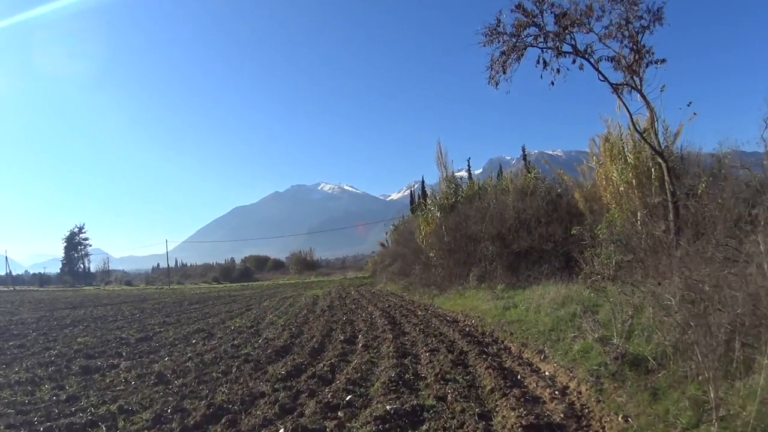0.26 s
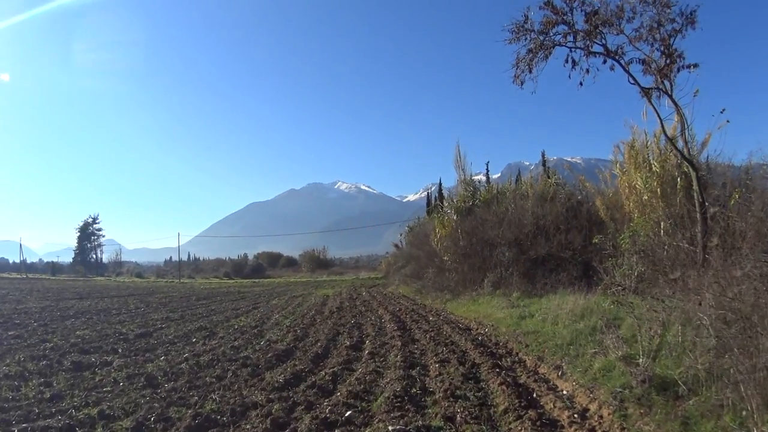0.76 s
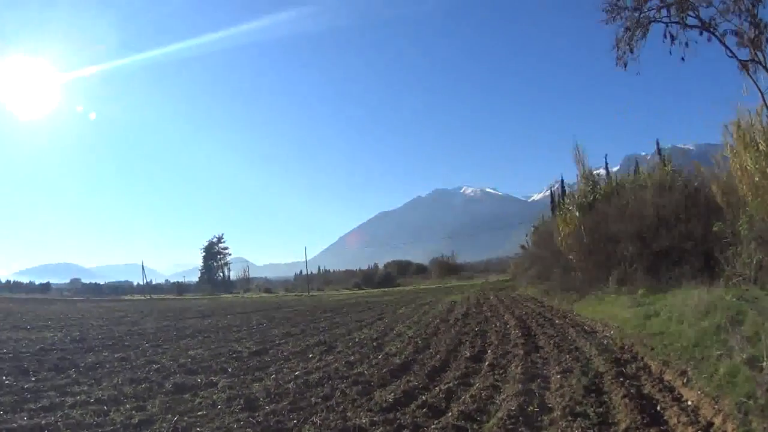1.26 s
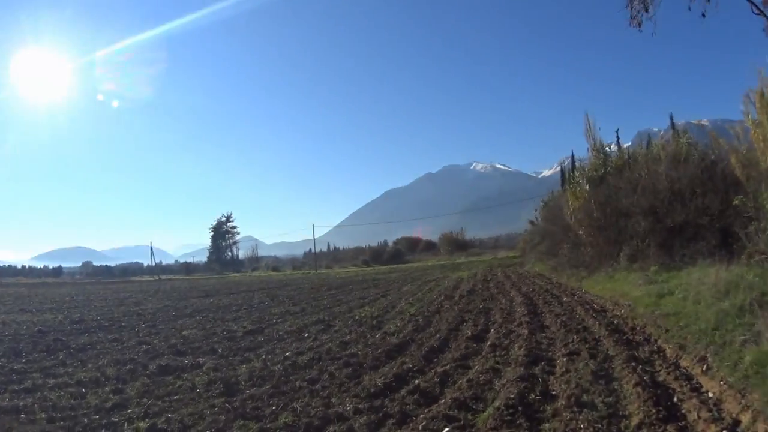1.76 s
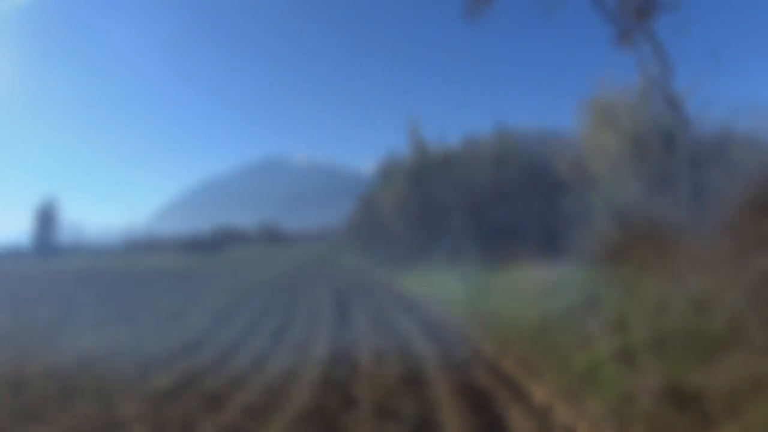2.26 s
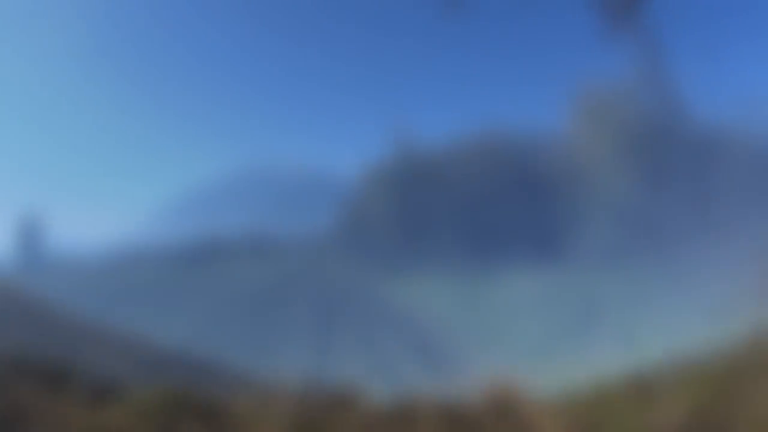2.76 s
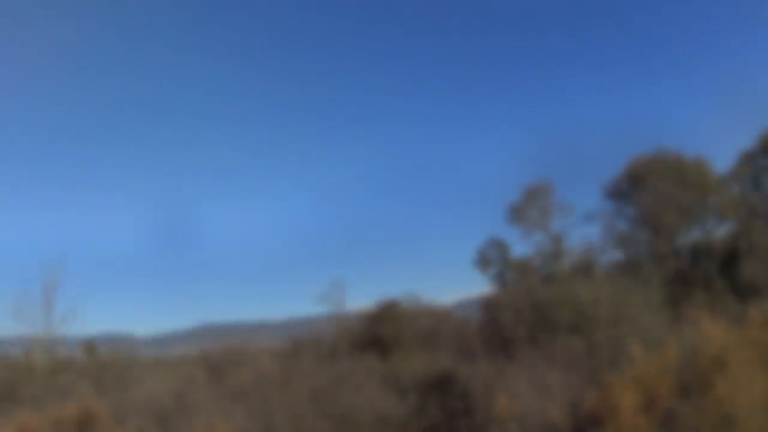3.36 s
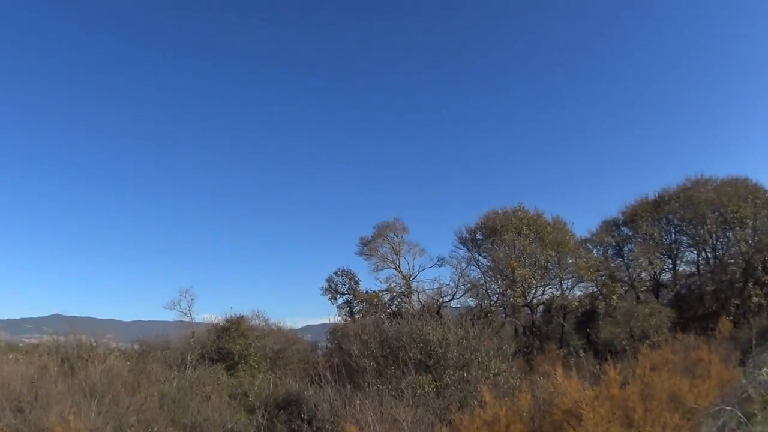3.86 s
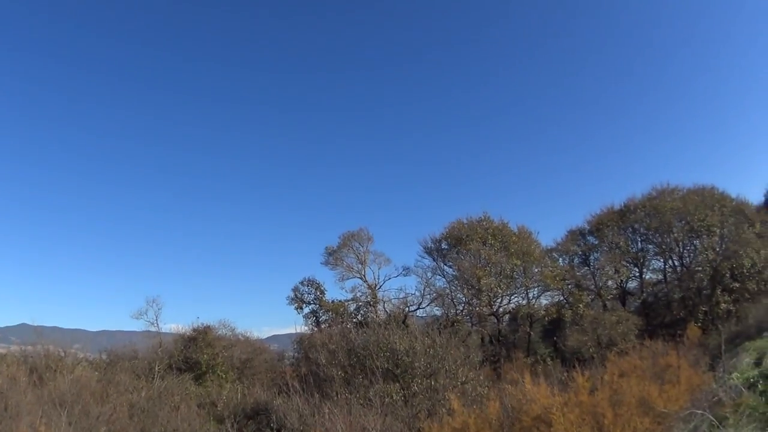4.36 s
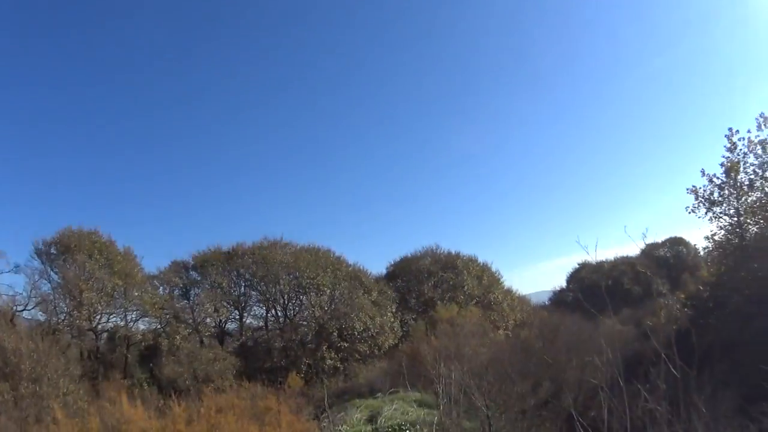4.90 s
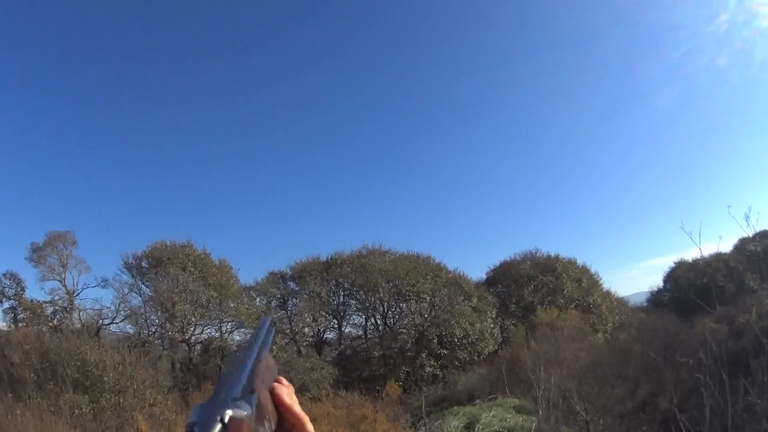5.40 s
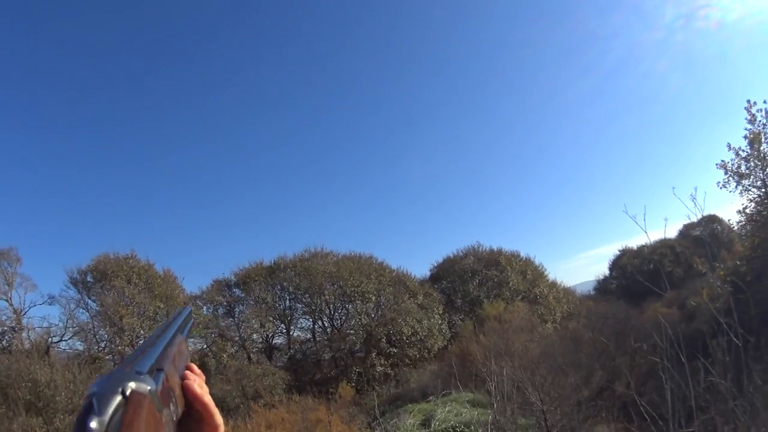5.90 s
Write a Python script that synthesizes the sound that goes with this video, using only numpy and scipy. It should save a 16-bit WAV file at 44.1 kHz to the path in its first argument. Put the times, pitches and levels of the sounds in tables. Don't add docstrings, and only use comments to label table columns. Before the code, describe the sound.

Quiet open field with faint rustling, bird chirps and small knocks on a body-worn camera, then a sharp metal clack and one shotgun blast.

```python
import sys
import numpy as np
from scipy import signal
from scipy.io import wavfile
from scipy.ndimage import uniform_filter1d

SR = 44100
rng = np.random.default_rng(int(sys.argv[2]) if len(sys.argv) > 2 else 0)


def gain_from_decibels(decibels):
    exponent = np.asarray(decibels, float) / 20
    return 10 ** exponent


def waveform_to_disk(signal):
    frames = np.transpose(np.atleast_2d(signal))
    scaled = np.clip(frames, -1, 1) * 32767
    samples = np.round(scaled).astype(np.int16)
    wavfile.write(sys.argv[1], SR, samples)


N = 270906

FOLLOW = {"rumble": (-73.5, 1, 1.8), "cloth": (-60.5, 0.84, .05), "grass": (-66, 0.42, 1),
          "fizz": (-72, 0.14, 0.34)}
# (f/Hz, likeness from -1 to 1)
CLOSE_LIKENESS = [(60, 0.77), (220, 0.86), (700, 0.59), (1300, 0.9), (1800, 0.74), (2300, 0.62),
                  (3000, 0.84), (5500, .87), (11600, 0.88)]


def evened(x):
    return x / np.sqrt(np.mean(x ** 2) + 1e-20)


def read(points, hz):
    f, value = np.transpose(points)
    return np.interp(np.log(hz + 1), np.log(f + 1), value)


def add(mix, s, sound):
    part = mix[:, round(s * SR):][:, :sound.shape[-1]]
    part += sound[..., :part.shape[1]]


def panned(x, pan_db):
    return x * gain_from_decibels(np.array([[.5], [-.5]]) * pan_db)


def resonate(x, hz, width):
    turn = np.exp(2j * np.pi * np.cumsum(hz * np.ones(len(x))) / SR)
    r = np.exp(-np.pi * width / SR)
    smooth = signal.lfilter([1 - r], [1, -r], x / turn + 1e-18)
    return 2 * (turn * smooth).real


def noise(shape, likeness, count, size=512, patchy_db=2.0, flicker_db=1., band_hz=(0, 22050)):
    frames = 4 * count // size + 5
    hz = np.fft.rfftfreq(size, 1 / SR)
    a, b, c, d, patches = rng.standard_normal((frames, len(hz), 5)).T
    flicker = np.minimum(rng.exponential(1, frames), 3.5) - 1
    patches = evened(uniform_filter1d(uniform_filter1d(patches, 6, 0), 14, 1))
    same = np.clip(read(likeness, hz), -1, 1)[:, None]
    left = a + 1j * b
    right = same * left + np.sqrt(1 - same ** 2) * (c + 1j * d)
    z = np.array([left, right]) * gain_from_decibels(shape(hz)[:, None] + patchy_db * patches + flicker_db * flicker)
    inside = ((hz >= band_hz[0]) & (hz <= band_hz[1]))[:, None]
    whole, part = (signal.istft(v, nperseg=size, noverlap=3 * size // 4)[1][:, :count] for v in (z, z * inside))
    return whole / part.mean(0).std()


def rings(modes, phases, rise_s=0.00063):
    t = np.arange(1800) / SR
    x = sum(gain_from_decibels(db - 60 * t / t60) * np.sin(2 * np.pi * hz * t + p) for (hz, db, t60), p in zip(modes, phases))
    x = x * (1 - np.exp(-(t / rise_s) ** 2))
    return x / abs(x).max()


def follow(layer):
    # (t/s, effort above a steady walk/dB)
    motion = [(0, -8), (.3, -2.5), (.88, -2), (1.04, 5.5), (1.302, 0), (1.5, -1), (1.75, 3), (2.0, -1),
              (2.42, 3), (2.64, -5.5), (2.88, -3), (3.02, 0.5), (5.03, 1.5), (5.2, 8.5), (5.374, 11.5),
              (5.52, 9), (5.65, 4.5), (5.96, 4)]
    hard_db = 5.5
    walk_db, slope, extra = FOLLOW[layer]
    effort_db = np.interp(np.arange(N) / SR, *np.transpose(motion))
    return walk_db + slope * effort_db + extra * np.maximum(effort_db - hard_db, 0)


def field():
    # (f/Hz, level/dB per Hz)
    air_shape = [(59, -86), (100, -43), (299, -5), (330, -17), (370, -7), (492, -8.5), (592, -7),
                 (3000, -40), (3900, -32), (6600, -120)]
    rumble_shape = [(5, -12), (18, 8), (45, -6), (80, -5.5), (150, -18.5), (400, -32)]
    cloth_shape = [(500, -12), (900, -11), (1150, -9), (1370, -2.5), (1580, -15), (1870, -10), (2300, -8),
                   (2800, -13.5), (4000, -31.5)]
    grass_shape = [(1500, -73), (3000, -4), (4700, -3), (6500, -9), (7500, -18), (9000, -25)]
    fizz_shape = [(5500, -17.5), (7400, -7), (9000, -8), (10900, -7.5), (11400, -34)]
    # (f/Hz, likeness from -1 to 1)
    likeness = [(60, 0.98), (170, 0.6), (490, -0.34), (1410, 0.32), (4050, 0.14), (11600, 0.53)]
    rumble, cloth, grass, fizz = (gain_from_decibels(follow(layer)) for layer in FOLLOW)
    out = gain_from_decibels(-71) * noise(lambda f: read(air_shape, f), likeness, N, size=1024, flicker_db=4.5, band_hz=(150, 900))
    shaking = noise(lambda f: read(rumble_shape, f), likeness, N, size=2048, flicker_db=3.5, band_hz=(20, 150))
    out += panned(rumble, 0.34) * shaking
    out += cloth * noise(lambda f: read(cloth_shape, f), likeness, N, flicker_db=1.14, band_hz=(1000, 2800))
    out += grass * noise(lambda f: read(grass_shape, f), likeness, N, size=256, flicker_db=0.0, band_hz=(3300, 7000))
    out += fizz * noise(lambda f: read(fizz_shape, f), likeness, N, size=256, flicker_db=1.0, band_hz=(7500, 11000))
    return panned(out, -.1)


def crackle():
    force_db = follow("grass")
    luck_db = 3.5 * np.minimum(rng.exponential(1, N), 1.8)
    snaps_now = rng.random(N) < 110 / SR
    size = gain_from_decibels(force_db + .45 * (force_db + 56) + 8 + luck_db) * snaps_now
    pitch_hz = np.geomspace(1300, 8500, num=12)
    which = rng.integers(0, len(pitch_hz), N)
    out = np.zeros((2, N))
    for k, hz in enumerate(pitch_hz):
        snap = rings([(hz, 0, 16 / hz)], [0])
        out += panned(signal.oaconvolve(size * (which == k), snap)[:N], 3.1 * (-1) ** k)
    return out


def drones():
    # (t/s, length/s, f/Hz, level/dB, change over its
    # length/dB)
    lines = [(0, 1.22, 337, -70.5, 1.5), (0, .88, 648, -64.5, -9), (1.13, .2, 1865, -64.5, -4),
             (1.17, .35, 337, -65, 3), (1.47, .24, 337, -62, -8), (1.66, .78, 337, -74, 5),
             (2.36, 1.3, 336, -67.5, -9), (1.94, .09, 1870, -64, -3), (1.97, .07, 2520, -58, -1.5),
             (2.02, .16, 2655, -62, -8), (2.12, .16, 1865, -68, -1.5), (5.15, .4, 1032, -54, -8)]
    swell_s, waver_db = 0.03, 1.3
    out = np.zeros((2, N))
    for s, length, pitch_hz, db, fade_db in lines:
        t = np.arange(0, length, 1 / SR)
        hz = pitch_hz * (1 - 0.00437 * t)
        air = rng.standard_normal((2, len(t)))
        fuzz = np.array([evened(resonate(resonate(v, hz, 23), hz, 23)) for v in air])
        waver = evened(uniform_filter1d(uniform_filter1d(air[0], size=2500), size=2500))
        tone = 1.2 * np.cos(2 * np.pi * np.cumsum(hz) / SR)
        line = tone + (.45 if pitch_hz < 900 else .8) * fuzz
        to_edge = np.minimum(t + (s == 0), length - t)
        swell = np.clip(to_edge / max(swell_s, .25 * min(length, .4)), 0, 1)
        add(out, s, gain_from_decibels(db + waver_db * waver + fade_db * t / length) * line * swell)
    return out


def far_call(s, length, from_hz, to_hz, db):
    u = np.arange(0, length, 1 / SR) / length
    rising = to_hz > from_hz
    hz = to_hz + (from_hz - to_hz) * (1 - u) ** (2.5 if rising else 1)
    faint_db = -9 * (1 - u if rising else u)
    return s, hz, db + faint_db, 2.5


def near_call(s, sweep, held, note_hz, db):
    breaks_hz = (3520, 3990)
    knee_s = 0.00395
    t = np.arange(-sweep, held, 1 / SR)
    low = knee_s * np.logaddexp(0, -t / knee_s) / sweep
    late = np.maximum(t / held, 0)
    hz = note_hz + (2450 - note_hz) * low - 50 * late ** 2
    cracks_db = sum(-12 * np.exp(-((hz - f) / 70) ** 2) for f in breaks_hz)
    hz = hz + 30 * np.minimum(4 * late, 1) * np.sin(2 * np.pi * 42 * t - 1.5)
    faint_db = -16 / (1 + np.exp(t / .003))
    release_db = -3 * late - 16 * late ** 5
    return s - sweep, hz, db + faint_db + cracks_db + release_db, 1.5


def warble(curve):
    s, hz, db = np.transpose(curve)
    t = np.arange(s[0], s[-1], 1 / SR)
    return s[0], np.interp(t, s, hz), np.interp(t, s, db), 2.5 * (len(t) > SR / 20)


def birds():
    # (t the note is reached/s, sweep/s, held/s, f of the note/Hz, level/dB)
    near = [
        (.787, .036, .047, 4277, -42.5),
        (2.262, .031, .056, 4255, -43),
    ]
    # (t/s, length/s, from f/Hz, to f/Hz,
    # level/dB)
    far = [(0.038, 0.052, 4810, 4700, -68), (.09, 0.066, 4700, 4300, -73), (.834, .028, 4285, 4260, -55),
           (.863, .07, 4330, 4260, -61), (1.32, 0.058, 4250, 4700, -62), (1.392, .075, 4560, 4000, -65),
           (.746, .016, 3900, 4350, -58), (.74, .022, 4400, 5150, -60), (.762, .014, 4750, 5150, -59),
           (2.224, .016, 4700, 5500, -57), (2.227, .016, 3950, 4500, -59), (2.316, .014, 4270, 4250, -56)]
    # (t/s, f/Hz, level/dB)
    warbles = [
        [(2.615, 4600, -74), (2.633, 4630, -61), (2.646, 4400, -80), (2.662, 4280, -68), (2.676, 4170, -66),
         (2.69, 4270, -68), (2.701, 4400, -80), (2.714, 4570, -66), (2.77, 4270, -71)],
        [(2.302, 4900, -61), (2.314, 4820, -62), (2.322, 4720, -68), (2.335, 4690, -58), (2.378, 4620, -66)],
        [(4.426, 9700, -68), (4.43, 10050, -61), (4.4325, 9500, -56), (4.434, 8700, -64), (4.4358, 7950, -51),
         (4.4385, 7700, -54), (4.442, 8100, -59), (4.447, 8200, -66)],
    ]
    calls = [near_call(*row) for row in near] + [far_call(*row) for row in far] + [warble(c) for c in warbles]
    dry = np.zeros((2, N))
    for s, hz, db, flutter_db in calls:
        flutter = evened(uniform_filter1d(rng.standard_normal(8000), size=420))[:len(hz)]
        turn = 2 * np.pi * np.cumsum(uniform_filter1d(hz, size=60)) / SR
        overtone = gain_from_decibels(-.03 * (hz - 2900)) * np.sin(2 * turn)
        call = np.sqrt(2) * gain_from_decibels(db + flutter_db * flutter) * (np.sin(turn) + overtone)
        add(dry, s, call * signal.windows.tukey(len(hz), .2))
    t = np.arange(SR // 3) / SR
    tail = rng.standard_normal((2, len(t))) * gain_from_decibels(-60 * t / 0.43) * (t > .008)
    return dry + gain_from_decibels(-14) * signal.oaconvolve(dry, tail / np.linalg.norm(tail[0]), axes=1)[:, :N]


def knocks():
    # (f/Hz, level/dB, time to fall 60 dB/s)
    housing = [(173, -11, 0.012), (278, -27, 0.051), (434, -13.5, 0.053), (870, -15, 0.035),
               (1112, 8.5, 0.011), (1400, 4, 0.011), (2070, 9, 0.0076)]
    lid = [(3490, 6, 0.01), (4090, 5, 0.011), (4750, 32.5, 0.002), (5600, 21, 0.0047), (6870, 4, 0.0067)]
    # (t/s, peak level/dB, lid share/dB, tilt by where it is struck/dB per octave)
    blows = [(0.1, -48, -12, 6), (1.046, -41, -12, -9), (2.295, -43.5, -12, -3), (2.375, -39.5, -12, -6.5),
             (2.389, -37.5, -17, -6), (2.465, -43.5, -12, 6), (2.612, -42, -12, -4),
             (2.922, -39.5, -15, 2.5), (3.174, -29, -8.5, 0.3), (3.213, -44, -10, 7),
             (3.404, -39, -10, -2.5), (4.732, -28.5, -12.5, -0.8), (4.832, -43.5, -17, 3),
             (5.112, -37, -4, 6), (5.206, -29, -9.5, -1), (5.216, -28, -25, -7), (5.229, -44, -4, 6),
             (5.334, -29, -15, 6), (5.394, -36.5, -14, -10), (5.426, -22.5, -3.5, 5), (5.502, -30, -13, 3),
             (5.519, -37, -16, 1)]
    # (t/s, peak level/dB, f/Hz)
    ticks = [(0.2271, -44, 4750), (0.279, -48, 4900), (0.5228, -33.5, 3930), (0.523, -37.5, 2570),
             (0.5293, -43, 4400), (.5293, -45, 2900), (.521, -48, 4000), (.945, -44, 4100),
             (.946, -44, 2050), (.5735, -49, 4000), (0.5588, -46, 4100), (0.9812, -41.5, 4050),
             (1.044, -34, 4000), (1.042, -40, 4300), (1.0465, -41, 3600), (1.044, -39, 2290),
             (1.7799, -43, 10800), (1.8302, -42, 5850), (2.0315, -44.5, 4420), (2.424, -47, 4020),
             (2.455, -47, 4100), (2.9572, -39, 9400), (2.958, -42, 4860), (2.9714, -43, 4900),
             (2.9714, -51, 8200), (3.5902, -42, 2360), (4.0637, -46, 2280), (5.1894, -45, 5840),
             (5.2296, -42, 8000), (5.2285, -46, 5500), (5.249, -40, 4540), (5.3737, -39, 4470),
             (5.224, -46, 4400), (5.2287, -42, 2300), (5.26, -45, 5500), (5.271, -46, 6000),
             (5.287, -46, 6000), (5.393, -45, 4600), (5.469, -43, 3000), (5.528, -43, 2000),
             (5.5645, -43, 2350), (5.408, -42, 5700), (5.453, -40, 5800), (5.523, -45.5, 5600),
             (5.567, -48, 7000), (5.676, -47.5, 3770), (5.706, -36, 4500), (5.71, -41, 4300),
             (5.719, -46, 4400), (5.725, -46, 4300)]
    pings = [(3.4401, -53, 1240), (3.4765, -50, 1410), (3.5394, -50, 1410), (3.5663, -43, 1290),
             (3.5764, -45, 1270), (3.6287, -52, 1400), (3.707, -47, 1380), (3.7344, -50, 1370),
             (3.7803, -51, 1370), (3.8921, -49, 1410), (4.0532, -48, 1290), (4.2824, -56, 1360),
             (4.5072, -52, 1320), (4.574, -46, 1320), (4.6428, -49, 1270), (4.6688, -49, 1400),
             (4.6997, -49, 1410), (4.8903, -52, 1380), (4.9576, -49, 1320), (5.0075, -46, 1320),
             (5.033, -52, 1390), (5.0958, -48, 1370)]
    knock_pan_db, tick_pan_db = -4, -2.5
    out = np.zeros((2, N))
    for (s, db, lid_db, tilt_db), p in zip(blows, rng.uniform(-.35, .35, (len(blows), 12))):
        body = [(hz, level_db + tilt_db * np.log2(hz / 1400), t60) for hz, level_db, t60 in housing]
        lid_db = min(lid_db, -4 if db > -43 else -12)
        blow = rings(body, p) + gain_from_decibels(lid_db) * rings(lid, p[7:])
        add(out, s, panned(gain_from_decibels(db) * blow, knock_pan_db))
    for (s, db, hz), p in zip(ticks, rng.uniform(-0.84, 0.67, (len(ticks), 2))):
        t60 = 0.0045 * (4000 / hz) ** 0.73
        modes = [(hz, 0, t60), (hz * 1.165, -5, t60), (hz * 1.04, -11, 4 * t60)]
        tick = rings(modes, [*p, 0], .00025)
        add(out, s + .0004, panned(gain_from_decibels(db) * tick, tick_pan_db))
    for s, db, hz in pings:
        add(out, s, panned(gain_from_decibels(db - 2.5) * rings([(hz, 0, .045)], [0], .0015), tick_pan_db))
    return out


def bumps():
    # (t/s, peak level/dB, f/Hz)
    thuds = [(.2, -58, 30), (.965, -52, 32), (1.01, -51, 29.8), (1.76, -50, 29.4), (2.38, -66, 28),
             (2.65, -68, 28.3), (3.4, -57.5, 25.97), (5.13, -49, 35), (5.212, -44, 44.8), (5.24, -46, 60),
             (5.265, -39, 45), (5.291, -46, 50), (5.335, -52, 30), (5.378, -40.5, 55), (5.401, -37, 36),
             (5.471, -43, 50), (5.499, -47, 45), (5.555, -46, 30), (5.64, -52.5, 35), (5.986, -42, 190),
             (5.965, -44, 40), (6.018, -38, 90), (6.05, -30, 70), (6.051, -33, 120), (6.05, -35, 300)]
    out = np.zeros((2, N))
    for s, db, hz in thuds:
        cycles = np.arange(-3000, 3000) / SR * hz
        sway = np.exp(-(cycles / 0.4) ** 2) * -np.cos(2 * np.pi * cycles - .4)
        add(out, s + cycles[0] / hz, panned(gain_from_decibels(db) * sway, -2.8))
    return out


def scuffs():
    # (t/s, length/s, level/dB,
    # center f/Hz, width/octaves)
    single = [(0.164, 0.089, -58, 1920, 0.92), (0.194, 0.03, -56, 280, 0.2), (2.28, .065, -62, 210, .3),
              (0.192, 0.086, -62.5, 5130, 0.64), (0.199, 0.051, -62, 9800, 0.32),
              (0.308, 0.052, -62.5, 1580, 0.79), (0.725, 0.051, -59, 4930, 0.56),
              (0.898, 0.095, -61, 2090, .4), (0.914, 0.16, -64, 4500, .6), (1.651, 0.23, -62, 10350, 0.43),
              (1.68, 0.21, -60, 4840, 0.63), (1.772, 0.037, -58.5, 9500, 0.83),
              (2.213, 0.04, -60, 4900, 0.26), (2.321, 0.084, -58, 5800, 0.95),
              (2.333, 0.05, -62, 10700, .2), (2.321, 0.056, -55.5, 2330, 0.3),
              (2.365, 0.041, -50, 1400, 0.8), (2.58, 0.074, -60, 1670, 0.64),
              (5.147, 0.033, -49, 1660, 0.62), (5.317, 0.012, -43, 4800, 0.2), (5.317, .022, -48, 5500, .7),
              (5.31, 0.026, -54.5, 9800, 0.37), (5.289, 0.054, -48.5, 1770, 0.12),
              (5.331, 0.1, -49.5, 1400, 0.36), (5.463, 0.027, -50, 5460, 0.43),
              (5.466, 0.023, -58, 9250, 0.34), (5.073, 0.037, -59, 720, .15),
              (5.986, 0.017, -34, 756, 0.37), (6.099, 0.021, -33, 450, 0.47), (6.122, 0.02, -30.5, 540, .1),
              (5.26, .27, -54, 2080, .5), (6.1, .04, -33, 800, .3), (5.983, .012, -22, 1330, .2),
              (6.009, .012, -26, 1400, .2), (6.102, .011, -24, 1350, .2), (5.132, .04, -55, 2150, .15),
              (.17, .085, -62, 1380, .15), (.31, .06, -62, 1350, .2)]
    # (t/s, length/s, level/dB, center f/Hz, pan/dB)
    rubs = [(1.106, 0.19, -61.5, 2420, 3), (3.301, 2.16, -64, 1335, -3), (3.46, .06, -62, 2250, -3),
            (3.897, 0.84, -64, 2360, -4), (.89, .07, -57, 1330, -2), (5.252, 0.077, -57, 2350, 5),
            (5.325, 0.09, -45.5, 2326, 5), (5.407, 0.087, -52, 2320, 7), (5.247, .007, -48, 4500, -2),
            (5.576, 0.036, -56, 1380, -2), (5.704, .012, -52, 4400, -2), (5.44, .05, -52, 1350, -2),
            (5.69, .03, -58, 2200, -2), (5.55, .03, -56, 2200, -2)]
    rows = [(*row, -1.8) for row in single] + [(*row[:4], 0.11, row[4]) for row in rubs]
    out = np.zeros((2, N))
    for s, length, db, hz, octaves, pan_db in rows:
        t = np.arange(0, length, 1 / SR)
        grit = noise(lambda f: -np.minimum(12 * (np.log2((f + 1) / hz) / octaves) ** 2, 60), CLOSE_LIKENESS,
                     count=len(t), size=256 if length < .06 else 512, flicker_db=1.5)
        swell = np.sqrt(signal.windows.tukey(len(t), .6))
        add(out, s, panned(gain_from_decibels(db) * grit * swell, pan_db))
    return out


def clacks():
    # (f/Hz, level/dB, time to fall 60 dB/s, side first pushed +1 or -1)
    buckle = [(780, -14.5, .03, 1), (982, -5, 0.023, 1), (1380, -3.5, 0.023, -1), (2053, 5, .014, -1),
              (3490, -7, .012, 1), (4036, -9, .012, 1), (5000, -7, 0.0089, 1), (5590, 0, 0.0062, -1),
              (6850, -18, .012, -1)]
    latch = [(190, -18, 0.021, -1), (453, -14.5, 0.027, 1), (820, -12.5, 0.017, 1), (1070, -1.5, 0.016, 1),
             (1400, 2, 0.012, -1), (2080, -1.5, 0.016, -1), (3520, -18, 0.0083, -1), (4130, -7, 0.0053, 1),
             (4760, -7, 0.0053, -1), (5380, -12, 0.0047, 1), (6000, -22, 0.0069, -1),
             (6730, -26, 0.0092, 1)]
    # (t/s, peak level/dB)
    buckle_hits = [
        (0.9963, -37),
        (.999, -19),
    ]
    latch_hits = [
        (5.171, -5),
        (5.1764, -35),
    ]
    out = np.zeros((2, N))
    for part, hits in ((buckle, buckle_hits), (latch, latch_hits)):
        blow = rings([row[:3] for row in part], [np.pi * (row[3] < 0) for row in part])
        for s, db in hits:
            add(out, s, panned(gain_from_decibels(db) * blow, -3.5))
    return out


def shot():
    # (t/s, peak level/dB, rise/ms, time to fall 60 dB/s, tilt/dB per octave)
    bursts = [
        (5.9638, -20, 1.6, 0.018, 0.5),
        (5.972, -27, 2.4, 0.025, -3.5),
        (5.977, -6, 2.5, 0.03, -4),
        (5.982, 1, 1.23, 0.01, 9),
        (5.9856, -6, 0.57, 0.05, -7.5),
    ]
    # (f/Hz, level/dB per Hz)
    ports = [(100, -40), (200, -26), (330, -20.5), (600, -25), (800, -27), (1100, -10), (1340, 6),
             (1560, -2.5), (1800, -3), (2200, 3), (3400, -.5), (5000, .3), (5900, 1.5), (7300, -8.5),
             (10900, -5.5), (11600, -50)]
    # (t/s, peak level/dB, f/Hz, time to fall 60 dB/s)
    rocking = [
        (5.171, -22, 790, .02),
        (5.981, -12, 700, .015),
    ]
    wall_pan_db = (-.8, 1.5, -5)
    out = np.zeros((2, N))
    t = np.arange(4000) / SR
    for s, db, rise_ms, t60, tilt_db in bursts:
        burst = noise(lambda f: read(ports, f) + tilt_db * np.log2((f + 200) / 3000), CLOSE_LIKENESS, len(t),
                      flicker_db=-1.0)
        rise = np.sin(np.pi / 2 * np.minimum(t / rise_ms * 1000, 1)) ** 2
        burst = burst * rise * gain_from_decibels(-60 * np.maximum(t - rise_ms / 1000, 0) / t60)
        add(out, s, panned(gain_from_decibels(db) * burst / abs(burst.mean(0)).max(), 1.4))
    for s, db, hz, t60 in rocking:
        sway = rings([(hz, 0, t60), (2.0 * hz, -3, t60)], [0, 0])
        add(out, s, gain_from_decibels(db) * np.array([[1], [-1]]) * sway)

    echo_s = 5.988
    t = np.arange(echo_s - .004, N / SR, 1 / SR)
    late = t - echo_s
    level_db = -17.5 + 15.5 * late
    treble_db = -3.5 - 82 * late
    far_trees_db = 10.5 * np.clip((t - 6.097) / 0.023 + .5, 0, 1)
    bass_db = -19.5 - 90 * late + far_trees_db
    swell = np.minimum((t - t[0]) / 0.0059, 1)
    bands = ((900, 7200, 0), (7200, 12000, treble_db), (120, 900, bass_db))
    for (lo, hi, rel_db), pan_db in zip(bands, wall_pan_db):
        wall = noise(lambda f: read(ports, f) - 50 * ((f < lo) | (f >= hi)), CLOSE_LIKENESS, len(t), size=1024,
                     patchy_db=2.6, flicker_db=1.6)
        wall = wall / uniform_filter1d((wall ** 2).mean(0), size=500) ** 0.4
        add(out, t[0], gain_from_decibels(level_db + rel_db) * swell * panned(wall, pan_db))
    return out


def scene():
    quiet = field() + crackle() + drones() + birds()
    handling = knocks() + bumps() + scuffs() + clacks()
    return quiet + handling + shot()


def band_limit(x):
    return signal.sosfilt(signal.butter(12, 12200, fs=SR, output="sos"), x)


def record(dry):
    edge = signal.firwin(401, 11150, window=("kaiser", 7), fs=SR)
    limited = signal.oaconvolve(dry, edge[None], "same")
    return band_limit(np.clip(limited, -.78, .78))


dry = scene()
out = record(dry)
waveform_to_disk(out)
```